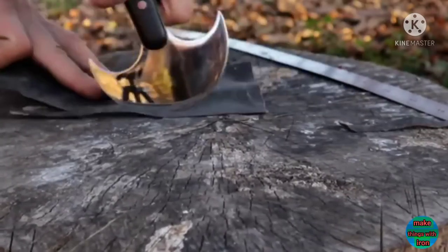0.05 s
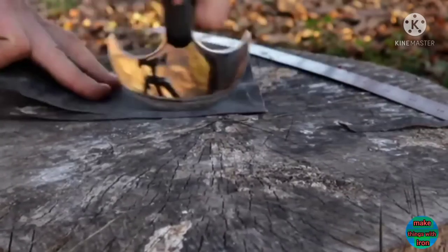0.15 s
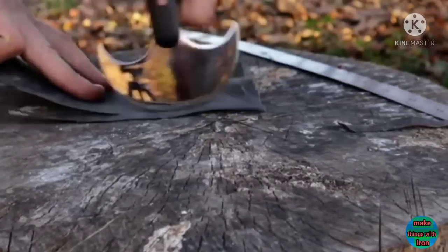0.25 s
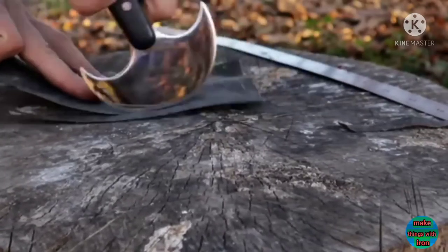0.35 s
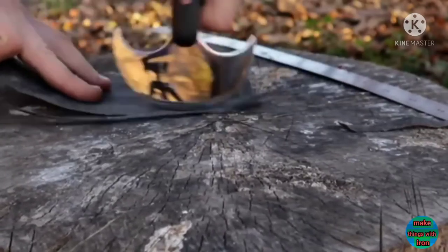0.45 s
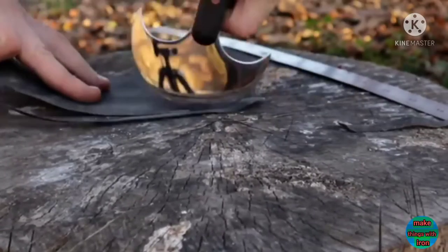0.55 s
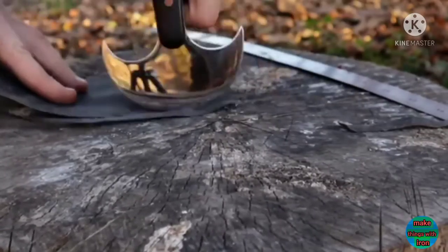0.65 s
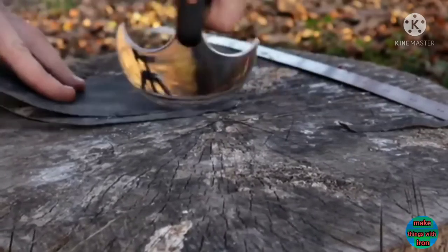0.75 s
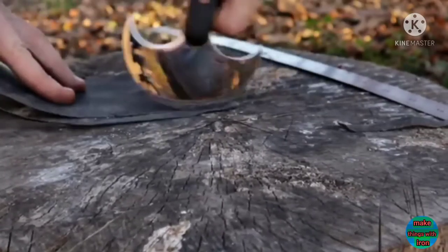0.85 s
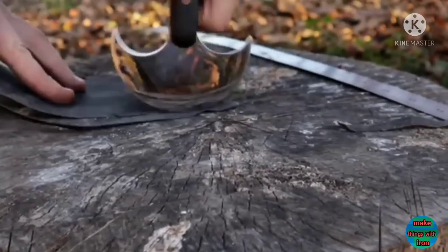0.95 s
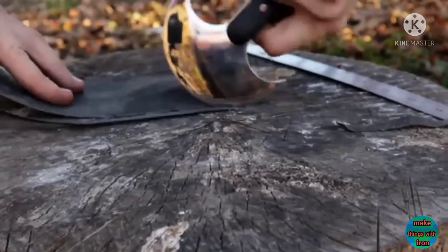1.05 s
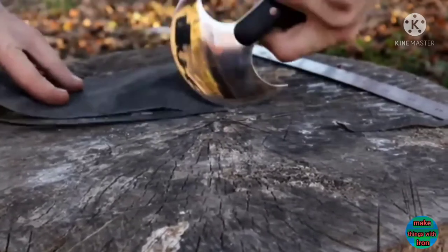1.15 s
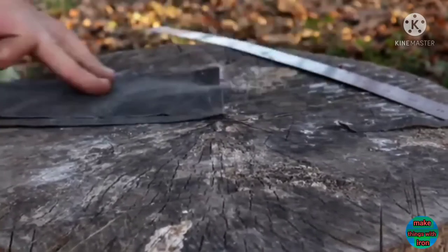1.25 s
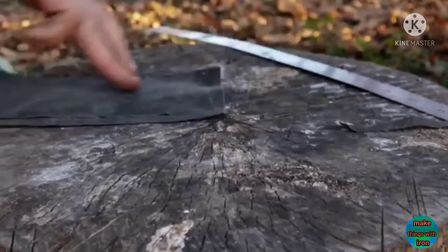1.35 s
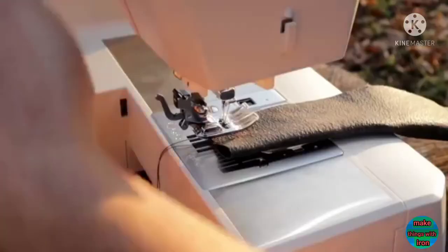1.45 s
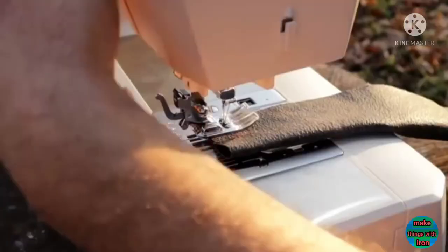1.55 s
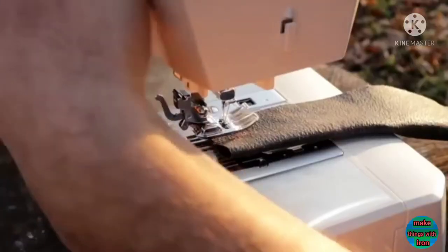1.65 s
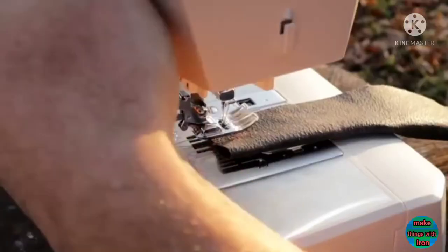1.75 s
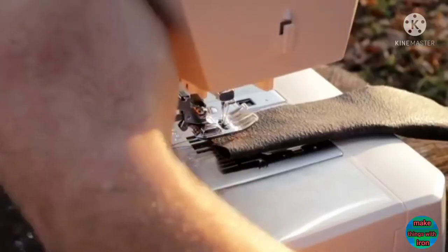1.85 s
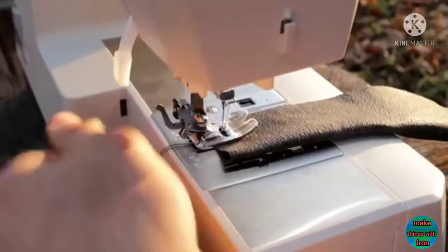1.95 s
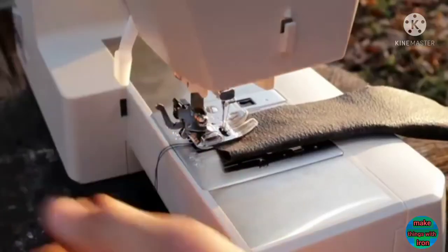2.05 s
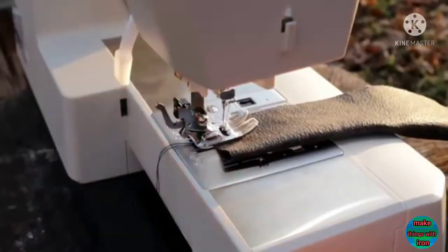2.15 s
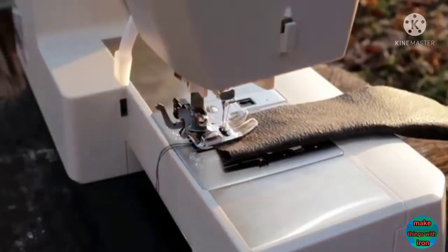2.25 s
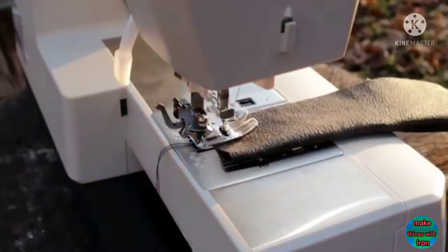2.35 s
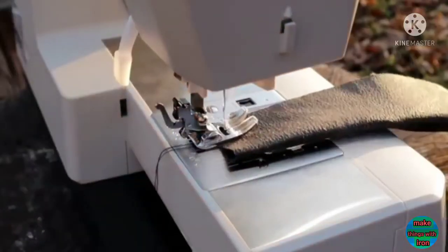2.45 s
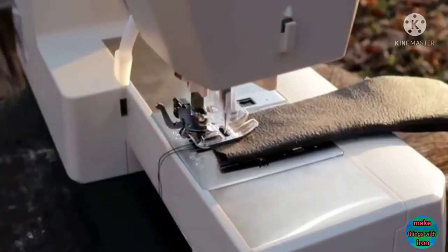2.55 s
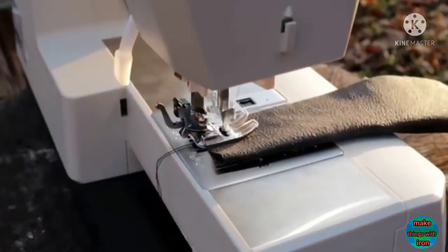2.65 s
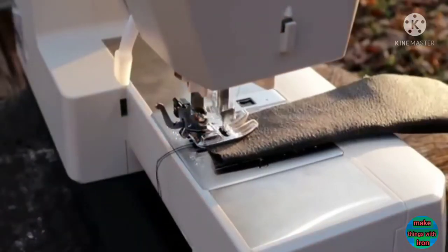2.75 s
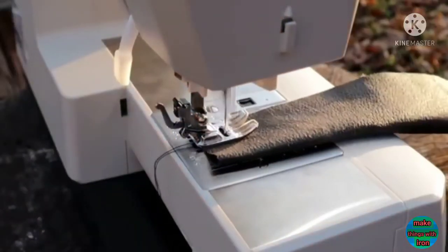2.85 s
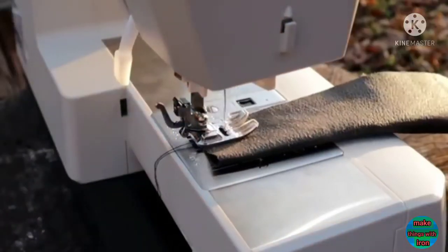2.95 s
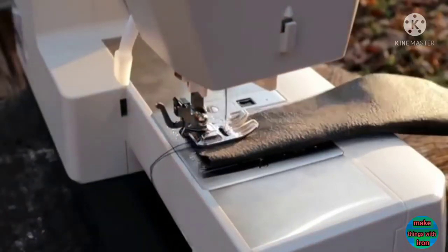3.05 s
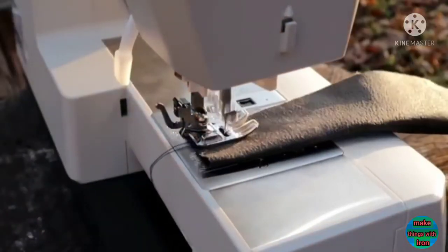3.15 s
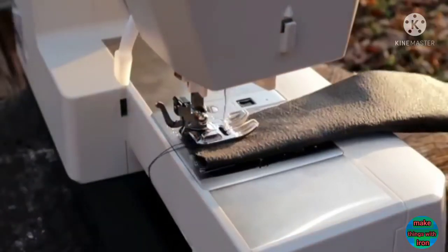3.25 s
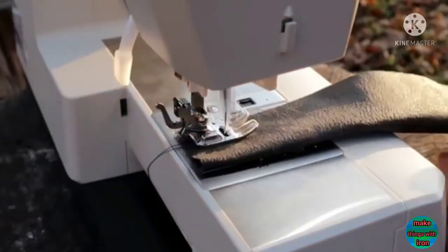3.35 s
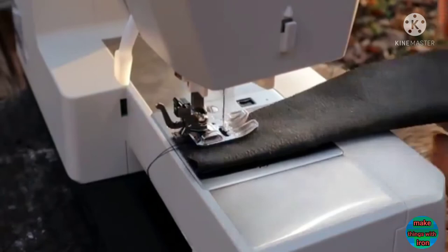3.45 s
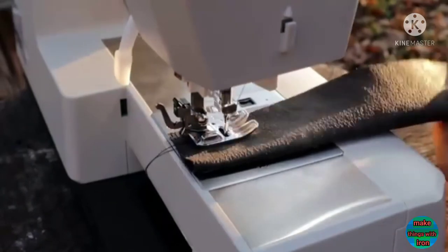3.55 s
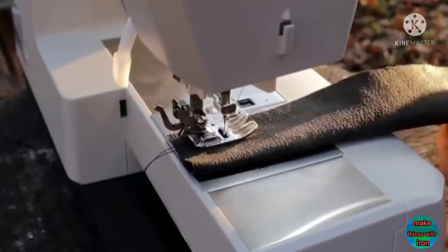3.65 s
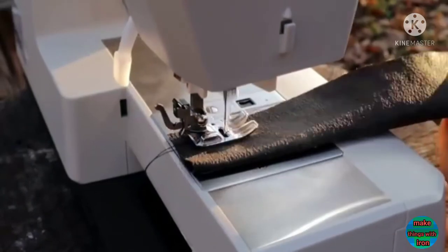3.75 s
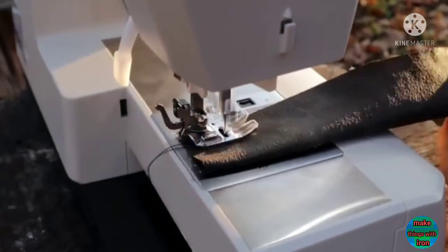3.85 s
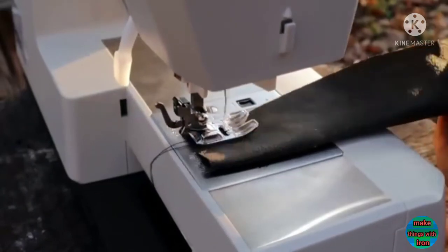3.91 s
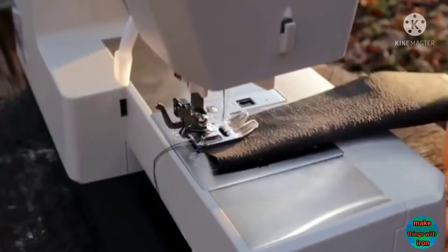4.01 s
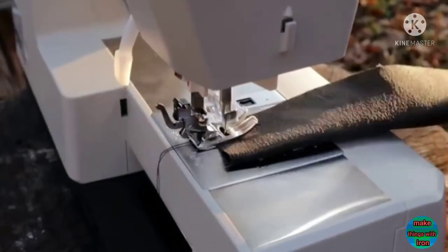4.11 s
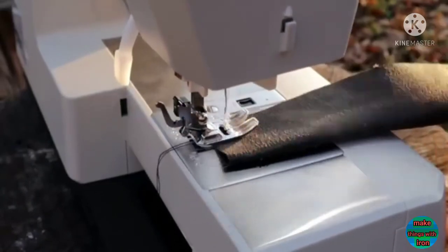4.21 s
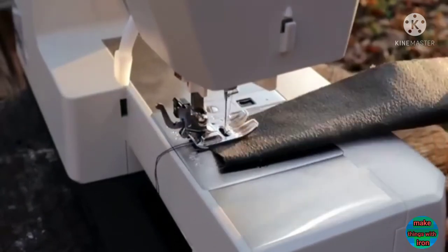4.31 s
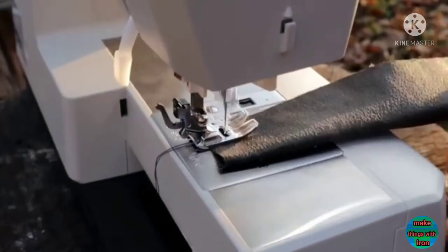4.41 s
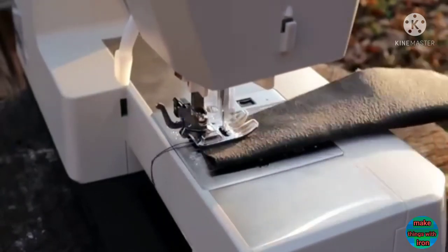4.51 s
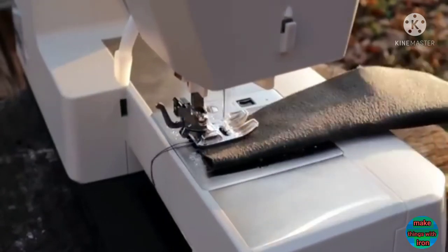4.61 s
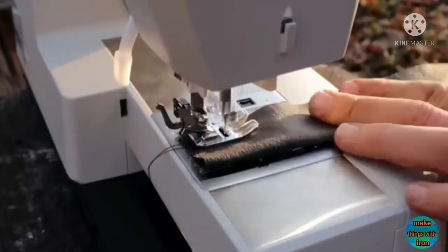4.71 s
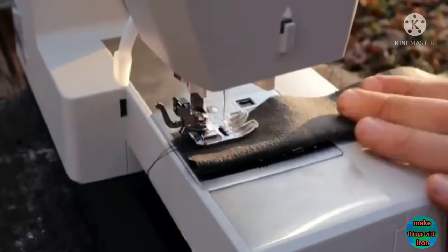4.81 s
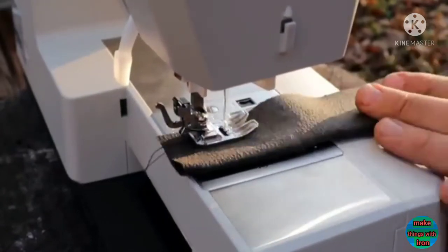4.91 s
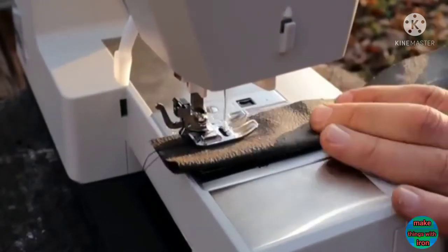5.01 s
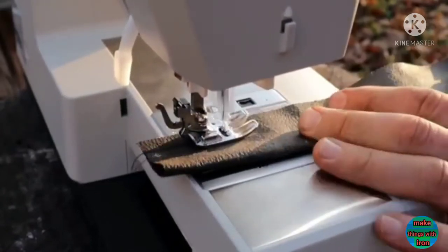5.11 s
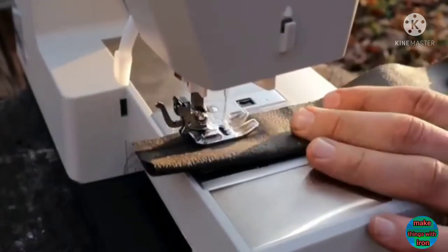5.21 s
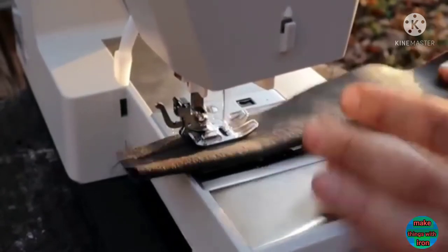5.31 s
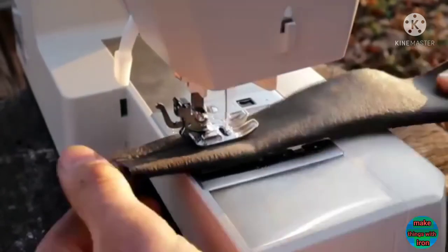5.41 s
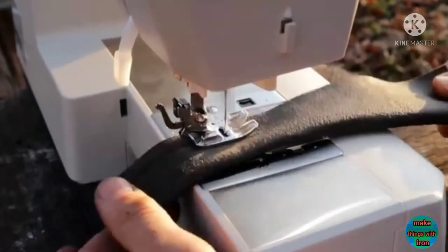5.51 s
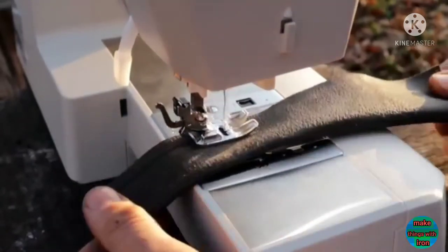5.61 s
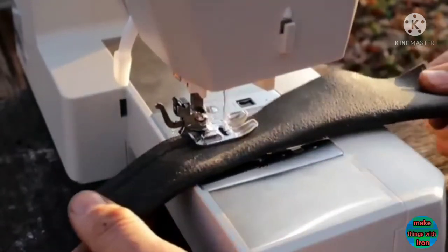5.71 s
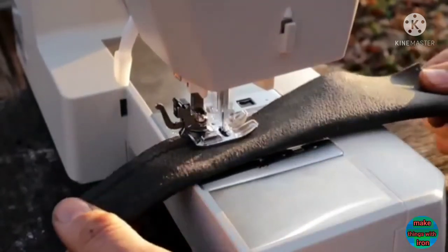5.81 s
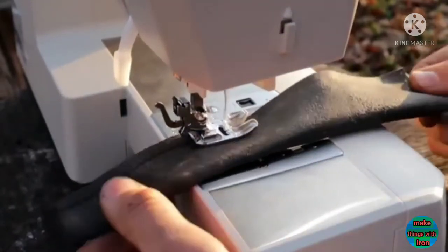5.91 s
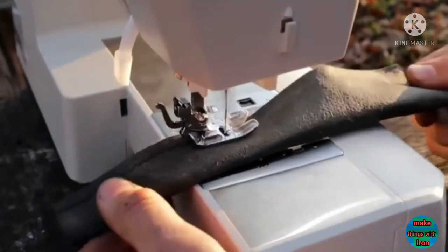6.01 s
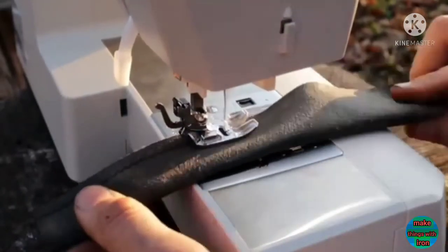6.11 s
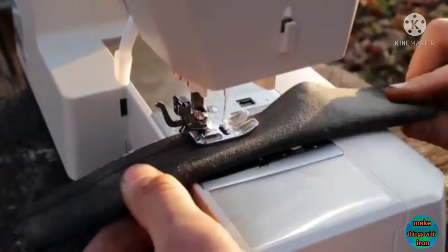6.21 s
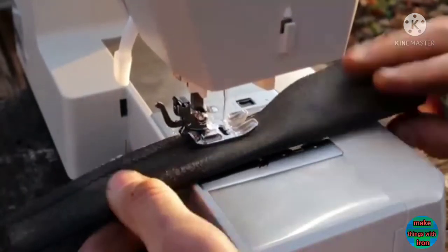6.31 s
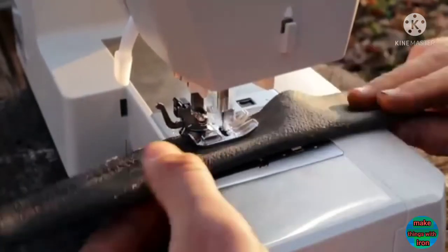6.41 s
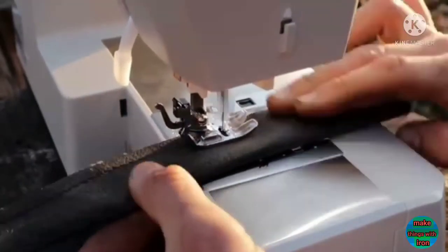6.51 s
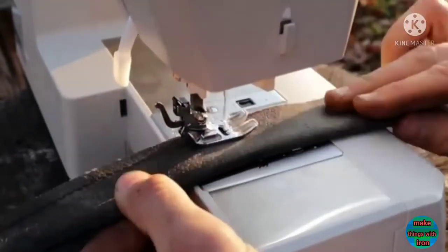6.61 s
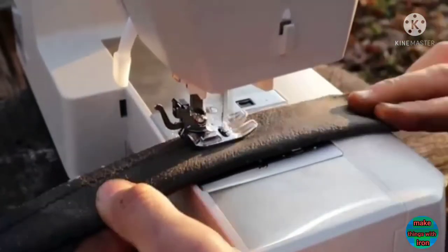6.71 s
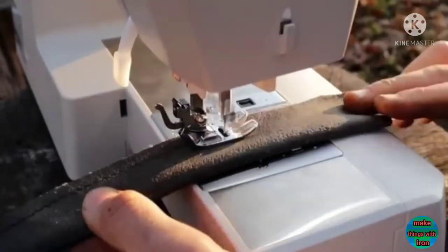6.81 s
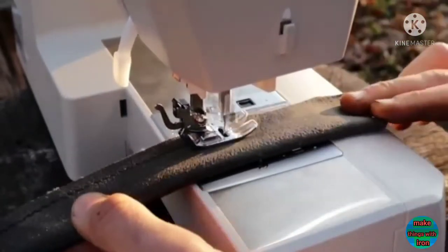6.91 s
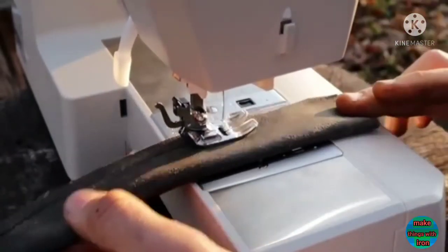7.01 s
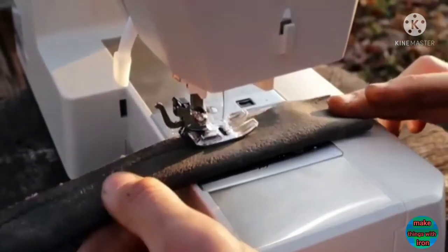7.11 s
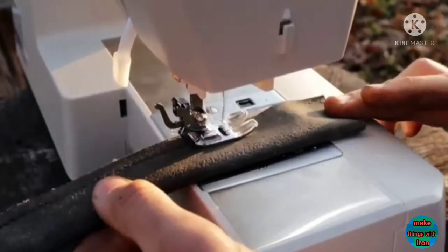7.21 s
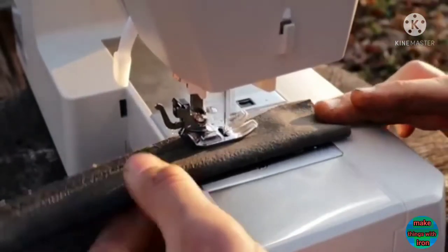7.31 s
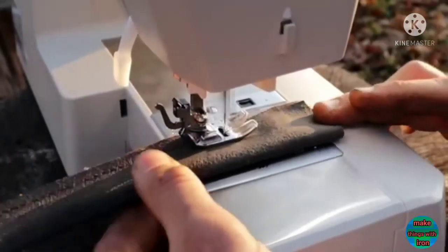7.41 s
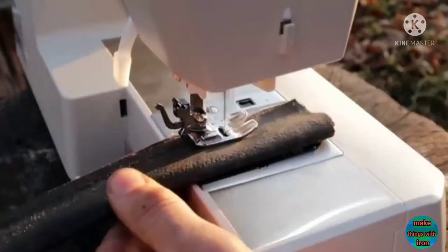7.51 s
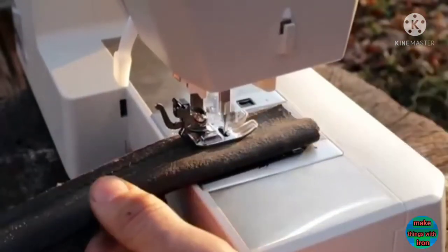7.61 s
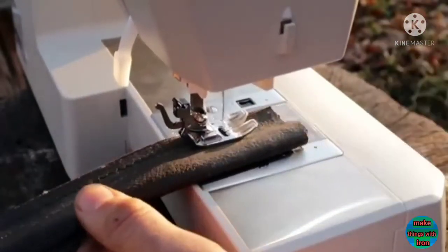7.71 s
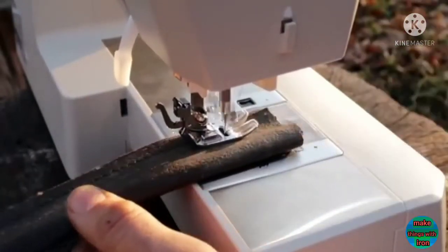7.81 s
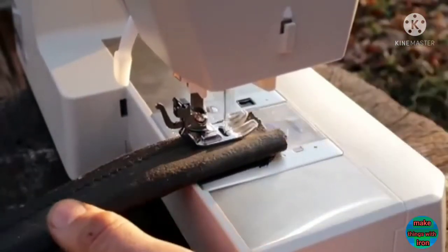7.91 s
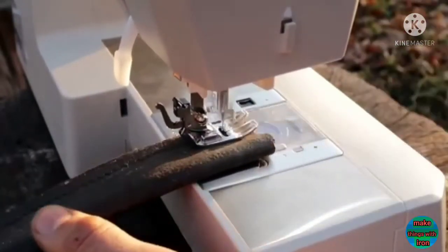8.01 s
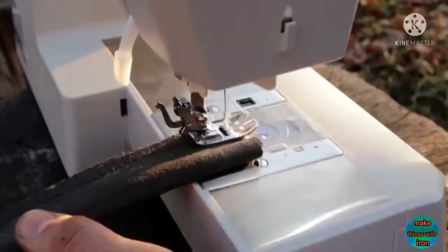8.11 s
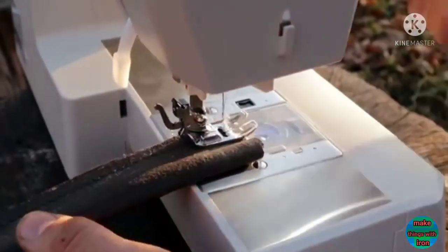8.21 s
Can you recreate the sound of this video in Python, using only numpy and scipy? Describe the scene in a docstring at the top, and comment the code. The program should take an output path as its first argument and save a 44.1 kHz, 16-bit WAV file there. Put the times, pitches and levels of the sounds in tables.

```python
"""First you hear soft scrapes outdoors: a round knife rocks through leather on a tree stump.
Then a sewing machine's presser foot drops with a clack, and the machine stitches the leather in two
short bursts and one long run. Its motor whines while gears and moving parts shake its body.
The long run is sped up: it stitches faster, and the machine rings higher by the same factor.
A distant rumble and a faint hiss lie behind it all."""
import sys
import numpy as np
from scipy import signal
from scipy.fft import rfft, irfft, next_fast_len
from scipy.io import wavfile
from scipy.ndimage import uniform_filter1d

SR = 44100
rng = np.random.default_rng(int(sys.argv[2]) if len(sys.argv) > 2 else 0)


def pcm_store(signal):
    """Save signal as 16-bit PCM."""
    levels = np.round(np.clip(np.atleast_2d(signal), -1, 1) * 32767)
    wavfile.write(sys.argv[1], SR, levels.astype(np.int16).T)


N = 364266
TIME = np.arange(N) / SR
TOP_HZ = 15150
SHORT_PACE, LONG_PACE = 0.99, 2.3  # multiply the pitches of the running machine's body, ticks and knocks

# Stretches of outdoor air: start_s, rumble_db, low_cut_hz, hiss_db, hiss_tilt_db_per_octave, stereo_db
AIR = [(0, -56.5, 30, -54, 1, 3), (1.46, -53.5, 30, -54, -1, 3), (2.391, -55.5, 152, -53.5, -1, -25),
       (4.33, -60, 140, -63, 1.5, -2), (4.531, -65, 280, -80, -9, -45)]
# Tone colours (how strong each pitch is) of the rumble and the hiss: pitch_hz, gain_db
RUMBLE_COLOUR = [(20, -30), (45, -3), (80, -0.5), (140, 2), (300, 0.5), (700, -9.5), (1500, -29.5)]
HISS_COLOUR = [(300, -8.5), (600, 0.5), (2000, -1.5), (4000, -5.5), (7000, -10.5), (14000, -20)]
# How much the close sounds differ between the ears: pitch_hz, gain_db
STEREO_SPREAD = [(400, -24), (2000, -38), (6000, -21), (14000, 0)]

# Strokes of the knife, then of hand and lever on the machine: middle_s, length_s, level_db, brightest_hz
RUBS = [(0.058, 0.096, -45.5, 2840), (0.234, 0.045, -52, 2400), (0.41, 0.076, -49.5, 3220),
        (0.519, 0.066, -48.5, 5330), (.612, 0.028, -49, 1900), (0.754, 0.056, -43, 2880),
        (1.007, 0.035, -48, 3100), (1.366, 0.14, -48.5, 3160), (1.649, 0.068, -51.5, 800),
        (1.78, 0.078, -44.5, 2540), (1.806, 0.0072, -32.5, 1510)]
# The blade snaps through fibres into the wood: start_s, level_db, fade_s (time to fall by 60 dB)
SNAPS = [(.394, -36, 0.032), (.587, -38, 0.0076), (1.177, -32.5, 0.017)]
# Tone colours of rubbed leather and of the snaps: pitch_hz, gain_db
LEATHER_COLOUR = [(500, -21), (1100, 1), (1900, 6.5), (2900, 9.5), (4000, 7), (6000, 0.5), (9000, -5.5),
                  (15000, -20)]
SNAP_COLOUR = [(500, -2), (4200, 0), (5500, -12), (14000, -19)]
# The blade's squeak: time_s, pitch_hz, level_db
SQUEAK = [(.09, 6800, -56), (.11, 6170, -44), (.14, 5040, -45), (.17, 4650, -65)]

# Dull bumps on the machine's plastic bed: start_s, level_db, pitch_hz, fade_s
BUMPS = [(1.808, -21, 830, 0.022), (1.81, -28.5, 1390, 0.044), (1.812, -36.5, 502, 0.095),
         (3.721, -14, 964, 0.043), (4.517, -18.5, 1055, 0.052), (5.383, -22.5, 1290, 0.017),
         (5.831, -21, 784, 0.017), (5.833, -27, 505, 0.047)]
# Hits of the presser foot as it drops and bounces: start_s, ring_db, crack_db
FOOT_HITS = [(1.9963, -30, -23), (2.002, -25, -17), (2.013, -28, -20), (2.0199, -11.5, -11.5)]
# Tones that each hit sets ringing: pitch_hz, level_db, fade_s
FOOT_TONES = [(390, -16, .05), (437, -14, .11), (504, -5, .09), (535, -15, .1), (718, -7, .05),
              (876, -3, .024), (1190, -2, .028), (1476, -9, .03), (2926, -30, .45)]
# Tone colour of each hit's crack: pitch_hz, gain_db
CRACK_COLOUR = [(60, -42), (250, -12), (520, 3), (1300, 4), (2000, -7), (3500, -1), (6000, -4.5),
                (8500, -17), (15000, -21)]

# Broad tone colour of the machine's body: pitch_hz, gain_db
BODY_COLOUR = [(70, -34), (190, -27), (440, -14.5), (540, -17), (770, -8), (900, -0.5), (1250, 1.5),
               (2800, 2), (3850, -6.5), (4600, -7.5), (6500, -3), (8200, -7), (11500, -12.5),
               (14500, -28.5)]
# Narrow peaks where its shell rings: pitch_hz, width_hz, boost_db
SHELL_PEAKS = [(301.6, 8.8, 10.5), (910, 121, 9), (1006, 52, 7), (2662, 37, 5.5), (5900, 350, 4)]
# Loose linked parts catch at starts and stalls: start_s, level_db, fade_s
CLACKS = [(2.396, -25.5, 0.025), (2.41, -28.5, 0.019), (2.447, -26, 0.023), (2.493, -24.5, .04),
          (2.536, -21.5, 0.04), (3.623, -28.5, 0.019), (3.678, -28.5, 0.034), (3.719, -18, 0.032),
          (3.819, -35.5, 0.04), (3.858, -24.5, 0.093), (4.247, -13, 0.04), (4.259, -22, 0.022),
          (4.463, -39.5, 0.042), (4.51, -31, 0.017)]
# The motor's whine, one list for each burst and the long run: time_s, pitch_hz, level_db
WHINES = [
    [(2.46, 1100, -47), (2.54, 1400, -35), (2.565, 1950, -38), (2.6, 2040, -29), (2.64, 1920, -33),
     (2.74, 2100, -43), (3.12, 2370, -42), (3.35, 2535, -32), (3.56, 2560, -39)],
    [(3.86, 1200, -45), (3.925, 1450, -38), (3.95, 1940, -32), (4.05, 2170, -37), (4.11, 1920, -34),
     (4.245, 2040, -34), (4.32, 1000, -45)],
    [(4.58, 3230, -42), (4.74, 3230, -41), (4.85, 3300, -37), (5, 3225, -40), (5.16, 3280, -39),
     (5.35, 3540, -45)],
]
# The whine and the growl below it: pitch_ratio, level_db, jitter_radians
WHINE_PARTS = [(1, 0, .65), (.8, -4, 2)]
# Tone of the gears: cycles_per_turn, level_db
GEAR_TONES = [(30, -22.5)]
# Narrow hiss of the motor's brushes: cycles_per_turn, width_hz, level_db
BRUSH_BANDS = [(87, 55, -26.5), (102.5, 130, -24.5), (341.5, 310, -17.5)]
# Contacts of needle bar, thread lever, hook and feed teeth in one stitch (one turn of the shaft):
# angle_turns, short_run_tick_db, knock_db, long_run_tick_db
STITCH_CONTACTS = [(0, 4, -10, -8), (.13, -7, -2, 4), (.238, 10, -5, 9), (.31, -9, 2, 2), (.355, -12, 4, 0),
                   (.407, 8, -2, 3), (.51, 0, -6, -1), (.655, -5, -1, 5), (.735, 5, -8, 10),
                   (.83, -9, 0, 5), (.9, 7, 0, 2)]
# Tone colours of the ticks (the needle bar rings at the peak) and the knocks: pitch_hz, gain_db
TICK_COLOUR = [(1200, -12), (3800, -2.5), (4450, 4.5), (5300, -1)]
KNOCK_COLOUR = [(1050, -3.5), (1700, -11), (4000, -28)]
# Shaft speed in the four runs (two bursts, a nudge of the pedal, the long run): time_s, stitches_per_s
FIRST_BURST = [(2.39, 10), (2.55, 10.2), (2.75, 12.5), (3, 13.7), (3.3, 14.5), (3.52, 15.1), (3.66, 11.2)]
SECOND_BURST = [(3.81, 9), (3.95, 9.5), (4.1, 11.1), (4.24, 10.8), (4.4, 8)]
NUDGE = [(4.46, 9), (4.534, 9)]
LONG_RUN = [(4.533, 34.5), (4.65, 37.03), (5.2, 36.87), (5.32, 40.9), (6.05, 41.95), (6.6, 41.09),
            (7.8, 42.42), (8.26, 42.41)]
# Where the shaft stands as each run begins: angle_turns
START_ANGLES = [.68, .8, .45, .27]
# The pedal press for each run: release_s, level_db, swell_s, tick_db, knock_db, tilt_db_per_octave
PEDAL_PRESSES = [(3.557, -24, 0.088, 0.5, 7.5, 1.16), (4.255, -25.5, 0.045, 2, 2.5, 1.24),
                 (4.535, -24.5, 0.05, -1, -9, 1), (8.213, -24, 0.0033, -1, -2, 0)]


def amp(db):
    """Turn decibels into a gain to multiply by."""
    return 10 ** (np.asarray(db) / 20)


def unit(x):
    """Scale a signal to an average power of 1."""
    return x / np.sqrt(np.mean(x ** 2) + 1e-20)


def along(colour, hz):
    """Read a tone colour's gain in dB at any pitch."""
    pitches, gains = np.transpose(colour)
    return np.interp(np.log(hz + 1), np.log(pitches + 1), gains)


def curves(rows):
    """Join timed rows with straight lines: one curve for each column after the time."""
    times, *columns = np.transpose(rows)
    return [np.interp(TIME, times, column) for column in columns]


def during(rows):
    """1 from the first row's time to the last row's, 0 elsewhere, with soft edges."""
    return uniform_filter1d(1. * ((TIME >= rows[0][0]) & (TIME <= rows[-1][0])), size=256)


def noise(size=N):
    """White noise."""
    return rng.standard_normal(size)


def wobble(rate, size=N):
    """A random curve, about 1 in size, that heads for a new value rate times a second."""
    points = noise(size // 8)
    return 1.2 * np.interp(np.arange(size) * rate / SR, np.arange(len(points)), points)


def coloured(x, gain_db, size=8192):
    """Filter x so that each pitch changes by gain_db(hz)."""
    cepstrum = irfft(np.log(amp(gain_db(np.fft.rfftfreq(size, 1 / SR))) + 1e-6))
    cepstrum[1:size // 2] *= 2  # folded so the filter rings only after a hit, never before
    cepstrum[size // 2 + 1:] = 0
    return signal.oaconvolve(x, irfft(np.exp(rfft(cepstrum))))[:len(x)]


def shaped(x, gain_db):
    """Like coloured, but white noise keeps its power."""
    power = np.mean(amp(gain_db(np.fft.rfftfreq(8192, 1 / SR))) ** 2)
    return coloured(x, gain_db) / np.sqrt(power)


def noise_hits(rows):
    """A quickly fading puff of white noise for each row."""
    out, t = np.zeros(N + SR), np.arange(SR // 8) / SR
    for start_s, level_db, fade_s in rows:
        out[round(start_s * SR):][:len(t)] += amp(level_db - 60 * t / fade_s) * noise(len(t))
    return out[:N]


def outdoor_air():
    """Distant rumble and faint hiss, steady within each stretch; the rumble is more alike in both ears."""
    mid, side = np.zeros((2, N))  # what the ears share, and how they differ
    starts = [round(stretch[0] * SR) for stretch in AIR]
    for start, end, stretch in zip(starts, starts[1:] + [N], AIR):
        _, rumble_db, cut_hz, hiss_db, tilt_db, stereo_db = stretch
        for channel, gain_db, rumble_drop_db in [(mid, 0, 0), (side, stereo_db, 12)]:
            rumble = shaped(noise(end - start),
                            lambda hz: along(RUMBLE_COLOUR, hz) - 10 * np.log10(1 + (cut_hz / (hz + 1)) ** 6))
            hiss = shaped(noise(end - start),
                          lambda hz: along(HISS_COLOUR, hz) + tilt_db * np.log2(1 + hz / 1000))
            air = amp(rumble_db - rumble_drop_db) * rumble + amp(hiss_db) * hiss
            channel[start:end] = amp(gain_db) * air
    return np.array([mid + side, mid - side])


def low_hum(start_s=1.46, end_s=2.39, pitch_hz=114, level_db=-57.5):
    """A brief, wavering hum near the machine's table."""
    loudness = amp(level_db + 2 * wobble(22.2)) * during([(start_s,), (end_s,)])
    return loudness * np.sqrt(2) * np.sin(2 * np.pi * pitch_hz * TIME + wobble(21.94))


def fibre_snaps():
    """Fibres snap as the blade goes through to the wood."""
    return shaped(noise_hits(SNAPS), lambda hz: along(SNAP_COLOUR, hz))


def rubbing(grain_db=3, judder_db=2, edge_db=6, leather_peak_hz=2900):
    """Knife, hand and lever rub with grainy friction; each stroke swells and fades."""
    out = np.zeros(N)
    for middle_s, length_s, level_db, brightest_hz in RUBS:
        near = abs(TIME - middle_s) < 2 * length_s
        size = near.sum()
        grains = unit(noise(size) * amp(grain_db * wobble(900, size) + judder_db * wobble(82.5, size)))
        swell = amp(level_db - edge_db * (2 * (TIME[near] - middle_s) / length_s) ** 2)
        shift = leather_peak_hz / brightest_hz
        out[near] += shaped(grains * swell, lambda hz: along(LEATHER_COLOUR, hz * shift))
    return out


def blade_squeak():
    """The blade gives one rough, falling squeak."""
    pitch_hz, level_db = curves(SQUEAK)
    return amp(level_db) * wobble(900) * np.sin(2 * np.pi * np.cumsum(pitch_hz) / SR) * during(SQUEAK)


def bed_bumps(attack_s=0.0011):
    """Soft knocks each make the plastic bed swing with one dying tone."""
    out, t = np.zeros(N + SR), np.arange(SR // 8) / SR
    for start_s, level_db, pitch_hz, fade_s in BUMPS:
        loudness = amp(level_db - 60 * t / fade_s) * (1 - np.exp(-t / attack_s))
        out[round(start_s * SR):][:len(t)] += loudness * np.sin(2 * np.pi * pitch_hz * t)
    return out[:N]


def presser_foot(crack_fade_s=0.048):
    """The foot that holds the leather drops on its spring, bounces and rings the bed."""
    ring, t = np.zeros(N + SR), np.arange(SR // 2) / SR
    swell = 1 - np.exp(-t / .0015)  # the bed takes a moment to swing
    for start_s, ring_db, _ in FOOT_HITS:
        for pitch_hz, level_db, fade_s in FOOT_TONES:
            loudness = amp(ring_db + level_db + rng.normal(0, 0.92) - 60 * t / fade_s) * swell
            ring[round(start_s * SR):][:len(t)] += loudness * np.sin(2 * np.pi * pitch_hz * t)
    cracks = noise_hits([(start_s, crack_db, crack_fade_s) for start_s, _, crack_db in FOOT_HITS])
    return ring[:N] + shaped(cracks, lambda hz: along(CRACK_COLOUR, hz))


def body_db(hz):
    """How strongly the machine's body and shell ring at each pitch."""
    peaks = sum(db / (1 + (2 * (hz - centre) / width) ** 2) for centre, width, db in SHELL_PEAKS)
    return along(BODY_COLOUR, hz) + peaks


def linkage_clacks():
    """Linked parts take up their slack and clack through the body as the machine starts and stalls."""
    brighten = [(1000, 3), (2000, 1.5), (3600, 7), (9000, 4.5)]  # pitch_hz, gain_db
    return shaped(noise_hits(CLACKS), lambda hz: body_db(hz) + along(brighten, hz))


def motor_whine(jitters_per_s=150):
    """The motor's rough whine climbs as it spins up, sags as the needle meets leather, falls as it coasts."""
    out = np.zeros(N)
    for rows in WHINES:
        pitch_hz, level_db = curves(rows)
        for ratio, part_db, jitter in WHINE_PARTS:
            phase = 2 * np.pi * ratio * np.cumsum(pitch_hz) / SR + jitter * wobble(jitters_per_s)
            loudness = amp(level_db + part_db + 2.5 * wobble(jitters_per_s)) * during(rows)
            out += loudness * np.sqrt(2) * np.sin(phase)
    return out


def gears_and_brushes(turns, rate, pace, repeat_db=-3, grit_db=2, flutter=.006, full_stitches_per_s=18):
    """Gears and bearings whirr, the motor's brushes hiss, and the gears sing louder with speed."""
    size = len(turns)
    surface = signal.resample(noise(1024), 16384)
    repeating = surface[(turns % 1 * len(surface)).astype(int)]  # the same on every turn
    whirr = unit((noise(size) + amp(repeat_db) * repeating) * amp(grit_db * wobble(500 * pace, size)))
    shaft = 2 * np.pi * np.cumsum(rate * (1 + flutter * wobble(10, size))) / SR
    speed_db = 40 * np.log2(rate / pace / full_stitches_per_s)  # 40 dB louder at twice the speed
    tones = sum(amp(db + speed_db) * np.sin(cycles * shaft) for cycles, db in GEAR_TONES)
    for cycles, width_hz, level_db in BRUSH_BANDS:
        for wave in (np.sin, np.cos):
            tones += amp(level_db) * wobble(width_hz * pace, size) * wave(cycles * shaft)
    return whirr + pace * tones


def ticks_and_knocks(turns, rate, pace, tick_decay_s=.0032, knock_decay_s=.007, scatter_db=1):
    """The same parts strike in every stitch, each time a little harder or softer."""
    size = len(turns)
    ticks, knocks = np.zeros((2, size))
    for angle, short_tick_db, knock_db, long_tick_db in STITCH_CONTACTS:
        stitch = np.floor(turns - angle)
        age = (turns - angle - stitch) / rate * pace  # a higher pace makes each hit die sooner
        force = amp(scatter_db * noise(size // 64))[stitch.astype(int)]
        ticks += force * amp(long_tick_db if pace > 1 else short_tick_db) * np.exp(-age / tick_decay_s)
        knocks += force * amp(knock_db) * np.exp(-age / knock_decay_s)
    ticks = coloured(unit(ticks * noise(size)), lambda hz: along(TICK_COLOUR, hz / pace))
    knocks = coloured(unit(knocks * noise(size)), lambda hz: along(KNOCK_COLOUR, hz / pace))
    return ticks, knocks


def sewing_run(speed, start_angle, pedal, pace, quiet_db=14, dull_db=26.5, coast_db_per_s=248):
    """Moving parts shake the body: quiet and dull at first, then full, fading once the pedal is let go."""
    release_s, level_db, swell_s, tick_db, knock_db, tilt_db = pedal
    running = (TIME >= speed[0][0]) & (TIME <= speed[-1][0])
    t, rate = TIME[running], curves(speed)[0][running]
    turns = start_angle + np.cumsum(rate) / SR
    ticks, knocks = ticks_and_knocks(turns, rate, pace)
    force = gears_and_brushes(turns, rate, pace) + amp(tick_db) * ticks + amp(knock_db) * knocks
    sound = unit(coloured(
        force, lambda hz: body_db(hz / pace) + tilt_db * np.log2(hz + 1) - 60 * (hz > TOP_HZ)))
    treble = signal.sosfiltfilt(signal.butter(2, 2530 * pace, "high", fs=SR, output="sos"), sound)
    slack = np.exp(-(t - t[0]) / swell_s)  # falls from 1 to 0 as the motor takes hold
    effort_db = level_db - quiet_db * slack - coast_db_per_s * np.maximum(t - release_s, 0)
    out = np.zeros(N)
    out[running] = amp(effort_db) * (sound - treble + amp(-dull_db * slack) * treble)
    return out * during(speed)


def scene():
    """The work is close and straight ahead; the long run, bumps and hum are the same in both ears."""
    short_runs = zip([FIRST_BURST, SECOND_BURST, NUDGE], START_ANGLES, PEDAL_PRESSES)
    mid = sum(sewing_run(speed, angle, pedal, SHORT_PACE) for speed, angle, pedal in short_runs)
    mid += motor_whine() + linkage_clacks() + presser_foot()
    mid += fibre_snaps() + rubbing() + blade_squeak()
    scatter = noise(SR // 200)  # 5 ms of scattered sound makes the ears differ
    scattered = signal.oaconvolve(mid, scatter / np.linalg.norm(scatter))[:N]
    side = coloured(scattered, lambda hz: along(STEREO_SPREAD, hz))
    long_run = sewing_run(LONG_RUN, START_ANGLES[-1], PEDAL_PRESSES[-1], LONG_PACE)
    return np.array([mid + side, mid - side]) + long_run + bed_bumps() + outdoor_air() + low_hum()


def record(dry):
    """Remove all treble above TOP_HZ."""
    size = next_fast_len(N + SR // 4)
    return irfft(rfft(dry, size) * (np.fft.rfftfreq(size, 1 / SR) < TOP_HZ), size)[:, :N]


dry = scene()
out = record(dry)
pcm_store(out)
```